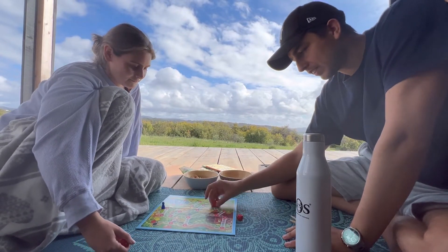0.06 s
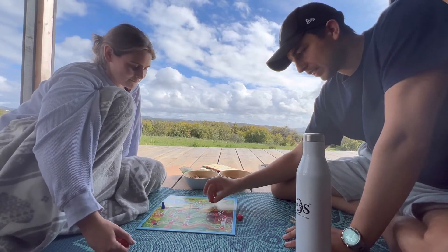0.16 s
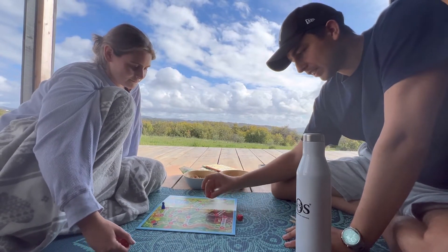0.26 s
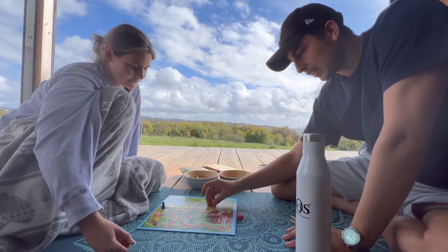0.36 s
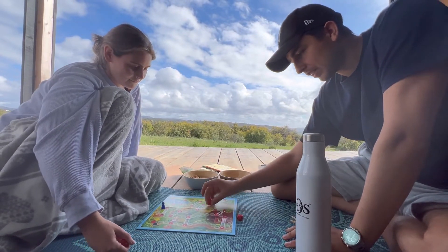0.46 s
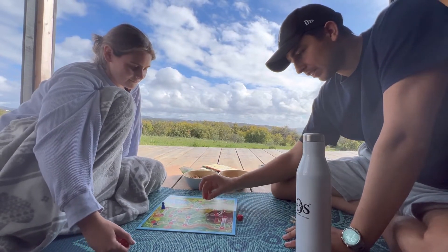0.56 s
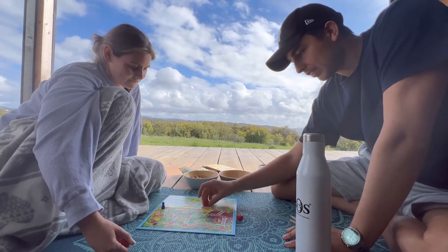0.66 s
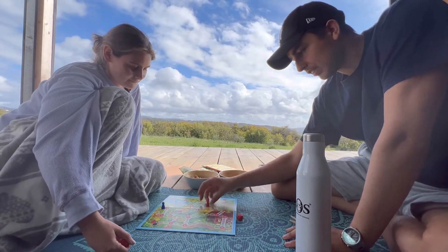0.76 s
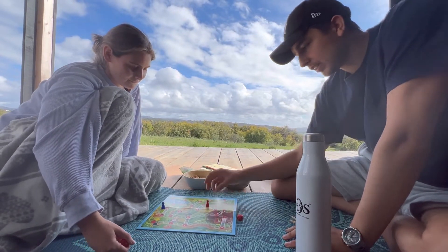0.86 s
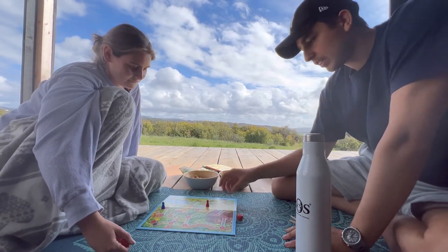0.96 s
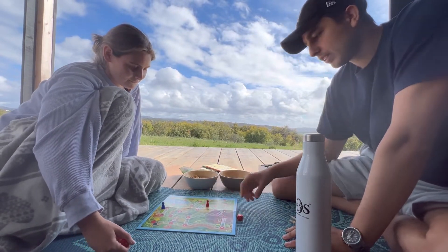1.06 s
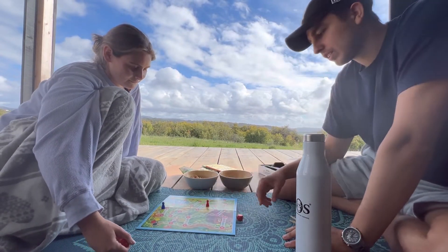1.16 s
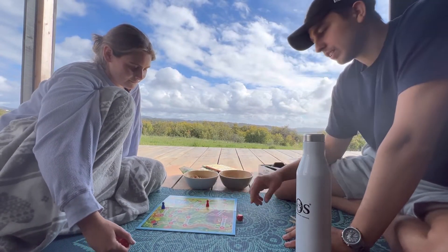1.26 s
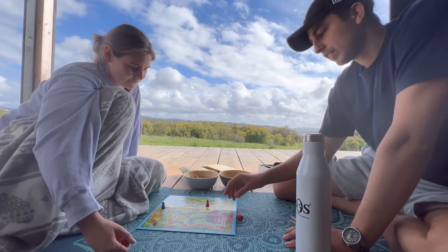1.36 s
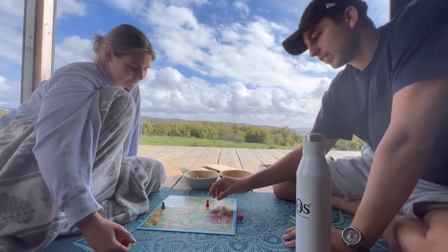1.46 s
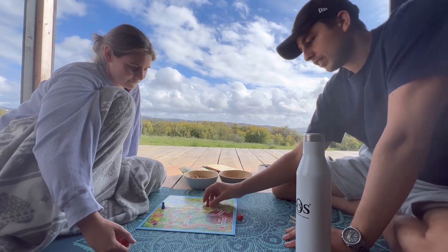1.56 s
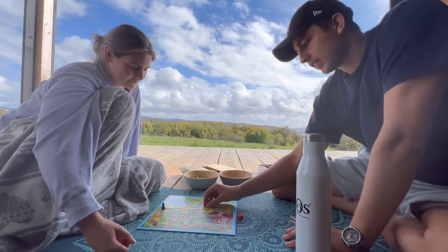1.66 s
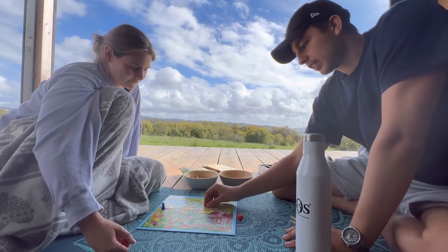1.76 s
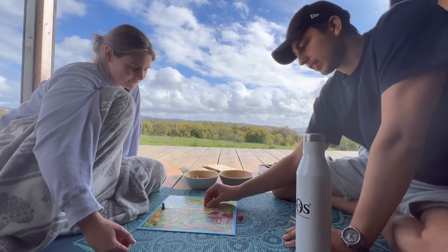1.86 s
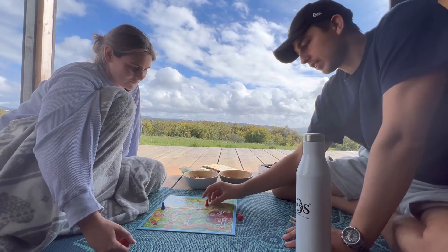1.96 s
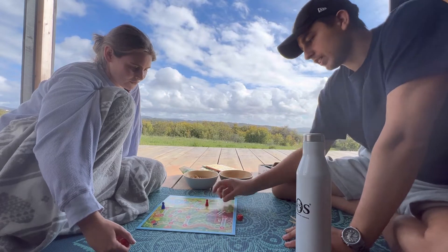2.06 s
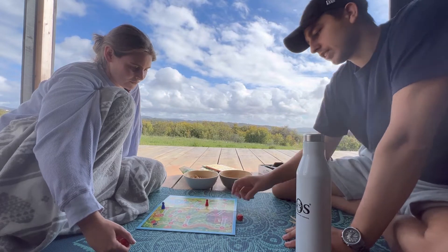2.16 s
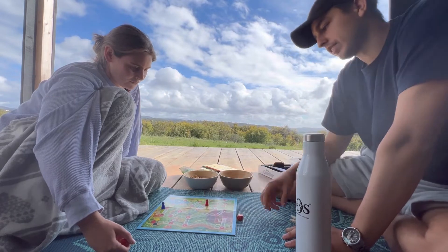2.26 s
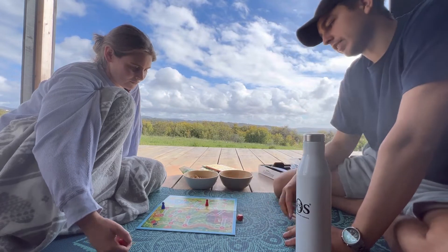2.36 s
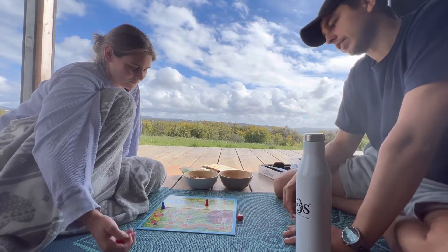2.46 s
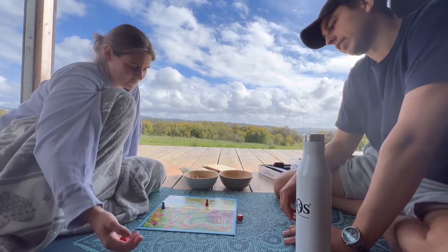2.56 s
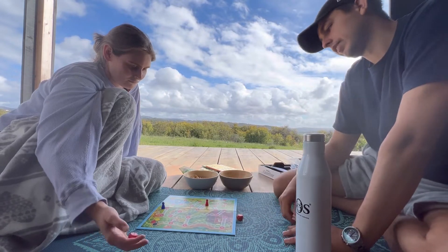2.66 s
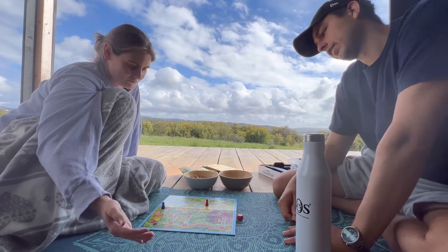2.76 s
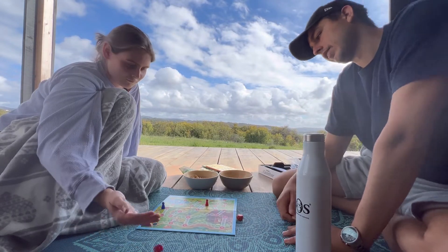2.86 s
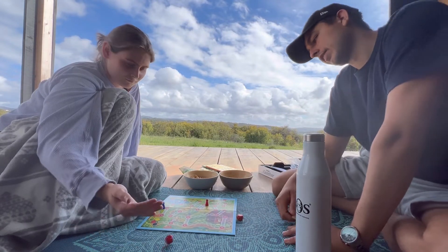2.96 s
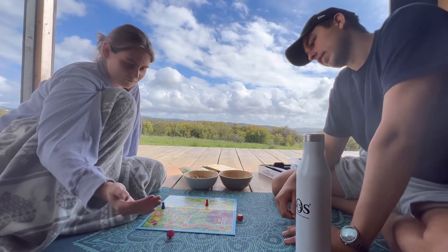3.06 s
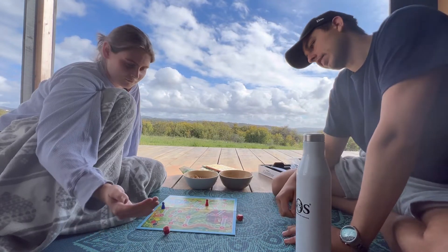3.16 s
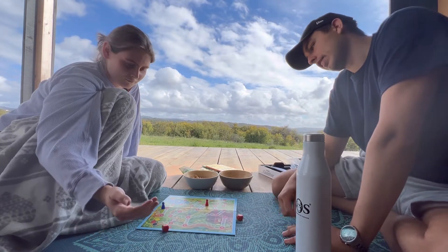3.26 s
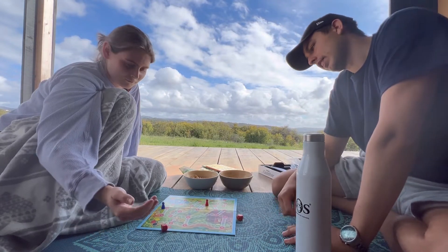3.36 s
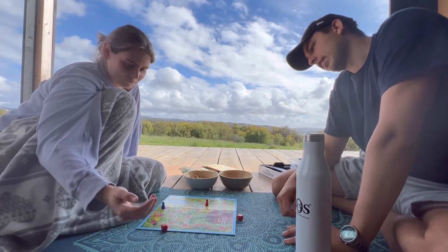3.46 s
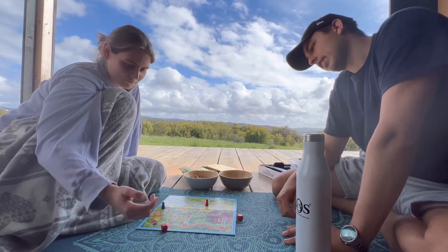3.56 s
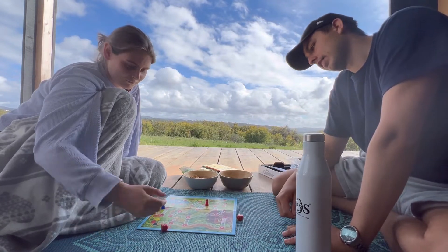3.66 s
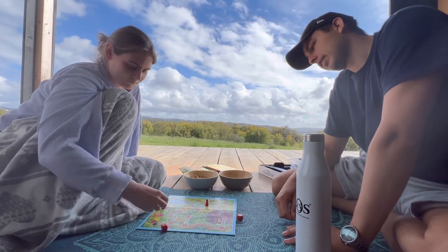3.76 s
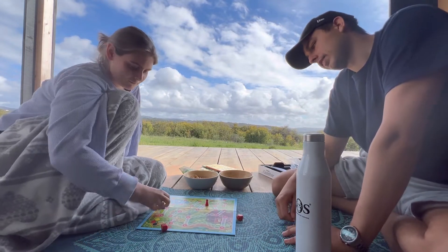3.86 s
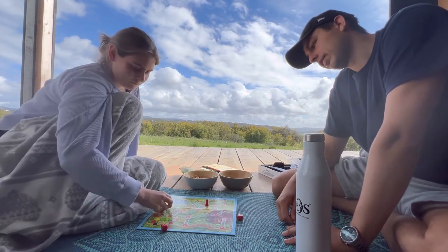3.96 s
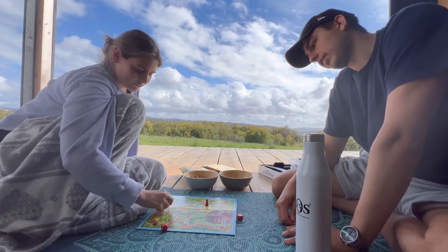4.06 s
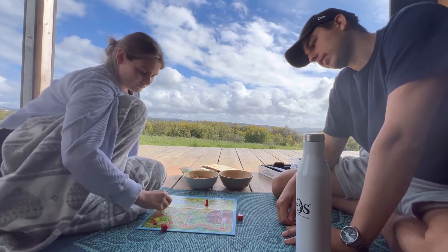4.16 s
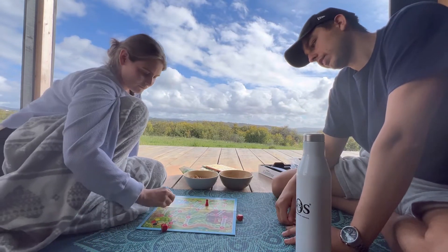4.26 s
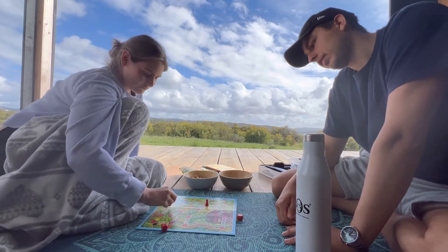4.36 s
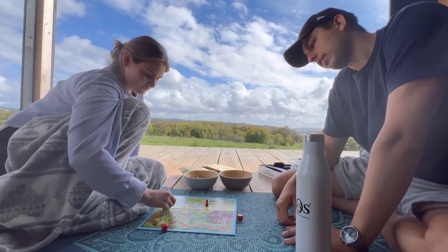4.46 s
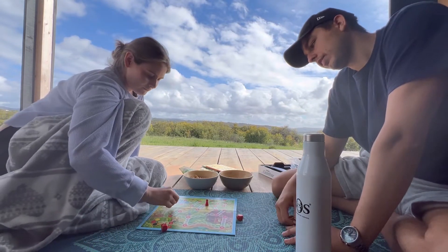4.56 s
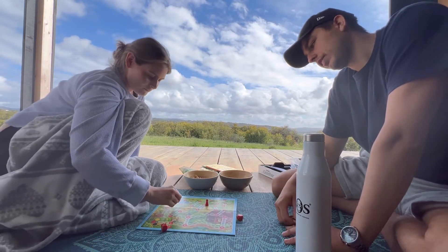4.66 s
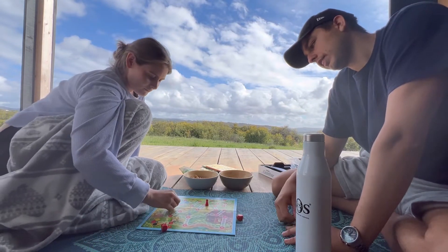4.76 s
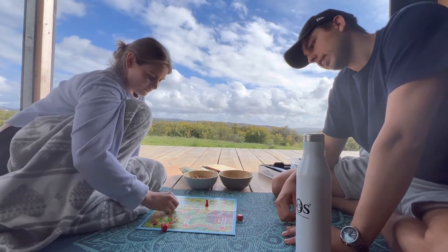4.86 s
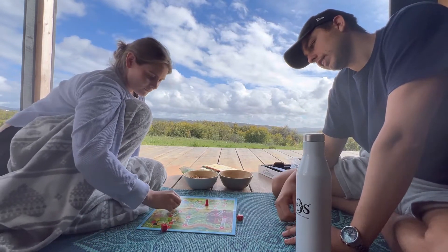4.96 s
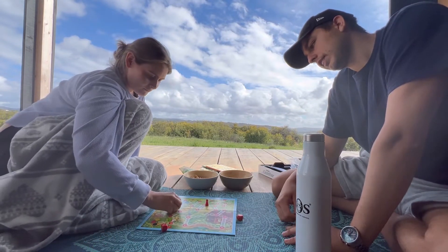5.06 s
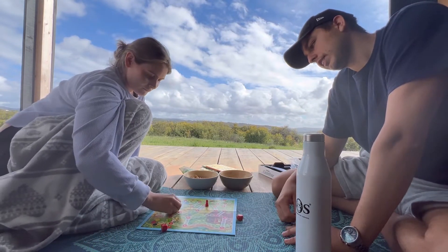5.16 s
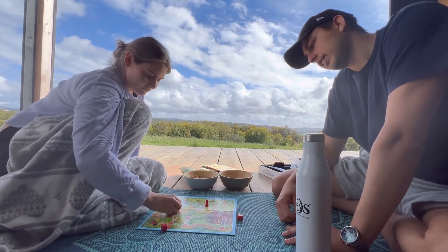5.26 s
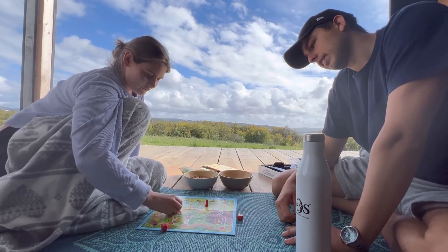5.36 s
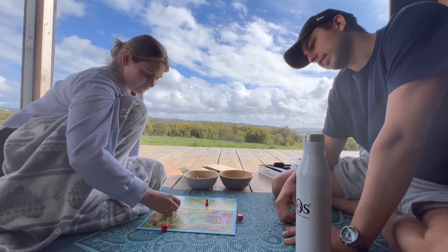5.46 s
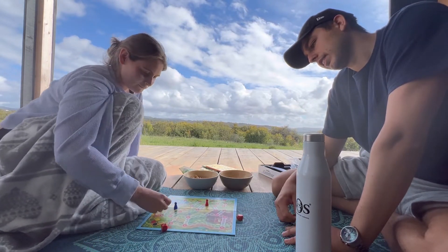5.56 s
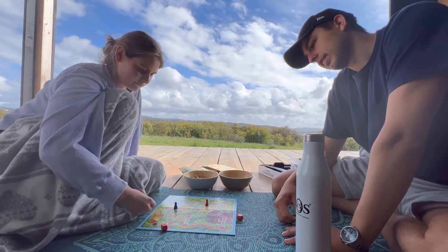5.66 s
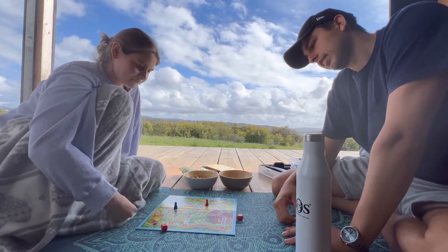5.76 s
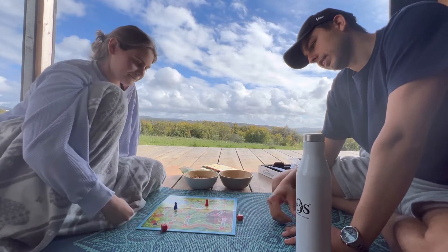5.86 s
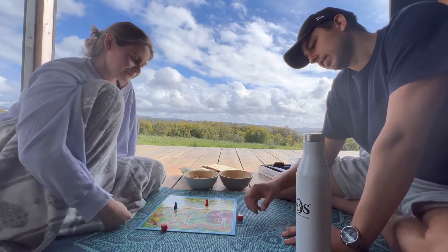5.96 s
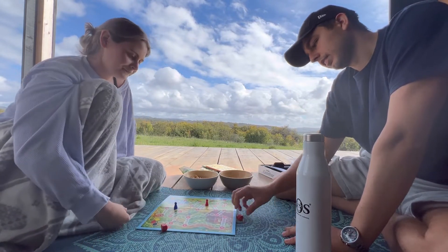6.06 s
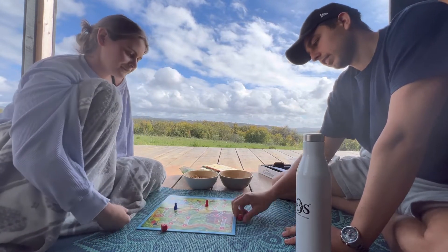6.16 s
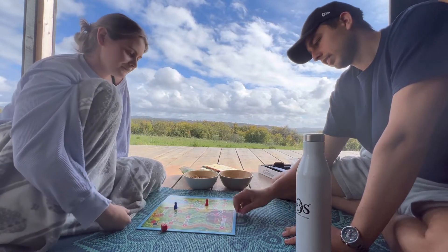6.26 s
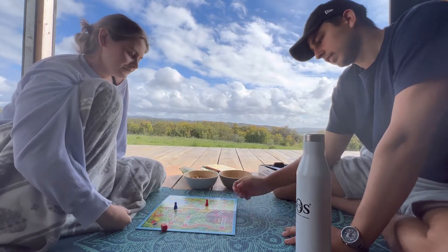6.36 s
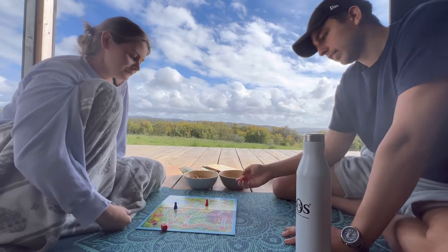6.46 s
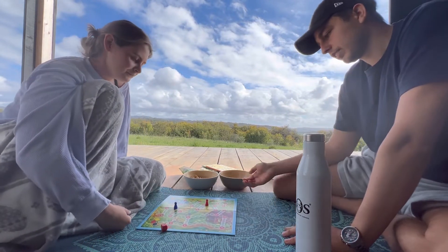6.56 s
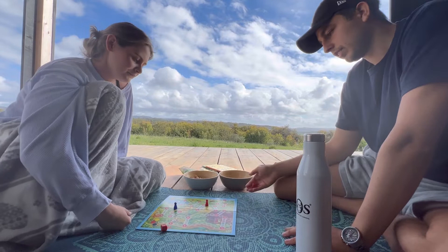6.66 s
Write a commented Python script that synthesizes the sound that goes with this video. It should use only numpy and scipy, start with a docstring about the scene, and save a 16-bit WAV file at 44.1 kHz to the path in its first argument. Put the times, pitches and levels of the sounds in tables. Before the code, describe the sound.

A board game is played close to a stereo microphone in a small wooden cabin, and each tap has a short, tight echo. In the first 0.7 seconds a pawn is stepped over the board with three firm taps. A short drag, light touches and soft sleeve rustles follow until about 2.5 seconds. There is a soft thud on the mat near 2.8 seconds, and a die lands with a brief clatter and roll around 3.2 seconds. Between 4.1 and 5.1 seconds come four more pawn taps, the first the sharpest and brightest. Small birds chirp faintly outside to the left now and then, twittering most from 5 to 5.8 seconds. Soft taps and rustling cloth fill the stretch from 6 seconds to the end at about 6.7. A low distant rumble, a faint hum and a thin hiss lie under everything.

```python
"""Inside a small wooden cabin, door open, stereo microphone near a card game board on a mat. A pawn is
stepped over the board and a die is dropped; each tap flutters between floor and low ceiling.
Three firm taps open the scene, then come sleeve rustles, light touches and short drags. The next loud
taps fall between 4 and 5 s. Small birds, outside to the left, twitter most just after that, and soft
taps and cloth close the scene. A low distant rumble, a faint hum and hiss lie under it all."""
import sys
import numpy as np
from scipy import signal
from scipy.fft import rfft, irfft, next_fast_len
from scipy.io import wavfile
from scipy.ndimage import uniform_filter1d, map_coordinates

SR = 44100
rng = np.random.default_rng(int(sys.argv[2]) if len(sys.argv) > 2 else 0)


def pcm_store(signal):
    """Save signal as 16-bit PCM."""
    levels = np.round(np.clip(np.atleast_2d(signal), -1, 1) * 32767)
    wavfile.write(sys.argv[1], SR, levels.astype(np.int16).T)


N = 295347

# Taps near the microphone. Each row: start in seconds, then the push in dB given to the board,
# the pawn's foot, its head, the bright crack, the gap under the board and the thud of the mat.
TAPS = [(0.029, -27, -27.5, -29.5, -42, -45, -47.5), (0.1102, -52.5, -54.5, -74, -87, -62, -56.5),
        (0.3452, -25.5, -28.5, -34.5, -44.5, -43, -44.5), (0.4388, -53, -59, -70, -83, -58.5, -59),
        (0.6387, -25, -24.5, -31.5, -46.5, -37.5, -47), (0.7441, -50, -40.5, -52.5, -64, -81, -79),
        (0.8799, -70, -63.5, -67.5, -66, -65.5, -84), (1.5147, -50, -55.5, -72, -65, -88, -61.5),
        (1.6337, -47, -59, -67, -67, -80, -69.5), (1.9689, -68, -64, -56.5, -55, -85, -94),
        (2.0406, -83, -65, -54.5, -60, -57, -64), (2.0594, -79.5, -68, -57, -67, -82.5, -78),
        (2.5294, -73, -76, -76.5, -87, -63, -69), (2.8084, -55, -52, -59, -61, -54, -42.5),
        (3.2135, -59, -56, -67, -64, -57, -63), (3.2313, -42, -42, -51.5, -51.5, -41.5, -51.5),
        (3.3686, -83.5, -85.5, -97, -70.5, -91, -90), (4.1394, -44.5, -23.5, -32.5, -21.5, -43.5, -64),
        (4.3826, -28.5, -34.5, -42, -47.5, -49.5, -59), (4.712, -72.5, -71, -81, -61, -85.5, -77.5),
        (4.7467, -28.5, -32.5, -49.5, -58, -46.5, -54.5), (5.049, -38, -44, -62, -63.5, -56, -62.5),
        (6.093, -64, -57, -73, -69, -78, -50), (6.137, -46, -50.5, -70, -77, -54.5, -50.5),
        (6.1875, -77, -72.5, -78, -64.5, -73, -62.5), (6.6799, -65.5, -66, -59.5, -62, -62, -79)]
# What rings at a tap. Each row: frequency in Hz, gain in dB, time to fall 60 dB in seconds.
BOARD_MODES = [(1073, -3, 0.024), (1240, -4, 0.018)]
PAWN_FOOT_MODES = [(1660, 6.5, 0.0071), (2187, -9.5, 0.0049), (2050, -18.5, 0.02)]
PAWN_HEAD_MODES = [(3293, 7, 0.0068), (3660, 2, 0.0097), (4200, -10, 0.0018)]
CRACK_MODES = [(6000, -8.5, 0.004), (6970, -1.5, 0.0061), (8360, 1, 0.0044), (9400, -13.5, 0.0081),
               (11020, -37.5, .002), (12320, -5, 0.0015), (14000, -16.5, 0.0015)]
GAP_MODES = [(452, 4.5, 0.012), (621, -12, 0.025)]
MAT_MODES = [(148.4, 5, 0.054), (207, 1.5, 0.05), (283, -7, 0.056)]
FLOOR_MODES = [(77.9, 2, 0.11)]
FLOOR_DB, BOARD_CUSHION = -1.5, 0.19   # floorboards against the mat; a tap on the board reaches them less
SPOT_SPREAD_DB, CHATTER_S = 3, .0011


def taps():
    """Each tap pushes every mode with a strength of its own; the light parts also chatter for a few ms."""
    start_s, board, foot, head, crack, gap, thud = np.transpose(TAPS)
    floor = thud + FLOOR_DB - BOARD_CUSHION * np.maximum(board - thud, 0)
    onsets = np.round(start_s * SR).astype(int)
    contact = np.arange(250)
    age = contact / (CHATTER_S * SR)
    chatter = rng.standard_normal((len(onsets), len(contact))) * age * np.exp(-age)
    parts = [(BOARD_MODES, .12, board), (PAWN_FOOT_MODES, .12, foot), (PAWN_HEAD_MODES, .15, head),
             (CRACK_MODES, .9, crack), (GAP_MODES, .03, gap), (MAT_MODES, 0, thud), (FLOOR_MODES, 0, floor)]
    out = 0
    for modes, chatter_share, db in parts:
        band_hz = [.85 * modes[0][0], 1.2 * modes[-1][0]]
        push = (contact == 0) + chatter_share * chatter
        spots_db = SPOT_SPREAD_DB * rng.standard_normal((len(onsets), len(modes)))
        spots_db -= spots_db.mean(axis=1, keepdims=True)   # the spot struck favours some modes
        for mode, spot_db in zip(modes, spots_db.T):
            clicks = np.full(N, 1e-18)
            clicks[onsets[:, None] + contact] = push * amp(db + spot_db)[:, None]
            out = out + ring(butter(clicks, 2, band_hz, "band"), [mode])
    return out


# Pieces dragged or rolled on the board. Each row: peak time in seconds, hold in seconds, level in dB.
DRAGS = [(0.7, .005, -54.5), (0.758, .055, -60), (1.55, 0.02, -75), (1.644, 0.005, -65.5),
         (2.042, .005, -78), (3.245, .015, -53), (3.29, .02, -75), (3.918, .01, -75.5),
         (4.84, 0.014, -69.5), (6.098, .005, -65), (6.156, .01, -61.5)]


def drags():
    """Dense, uneven grit clicks into board, pawn and mat."""
    grains = rng.random(N) < 1500 / SR   # about 1500 a second
    grain_db = np.minimum(rng.exponential(1, N), 4)
    grit = butter(grains * amp(grain_db) * rng.choice([-1, 1], N), 2, [120, 5000], "band")
    parts = [(BOARD_MODES, -5), (PAWN_FOOT_MODES, -2.5), (PAWN_HEAD_MODES, -19),
             (GAP_MODES, -12), (MAT_MODES, -8)]
    body = sum(amp(db) * rms_one(ring(grit, modes)) for modes, db in parts)
    return strokes(DRAGS, rise_db_per_s=694, fall_db_per_s=453) * body


# The cabin's diffuse sound, in octave bands.
# Each row: lower edge in Hz, gain in dB, time to fall 60 dB in seconds.
CABIN_TAIL = [(50.44, -10.5, 0.19), (86.2, -21.5, 0.34), (186.7, -20.5, 0.23), (400.3, -21.5, 0.21),
              (656, -22, 0.19), (1444, -23, 0.17), (3110, -25, 0.16), (6696, -28, 0.14),
              (11600, -33.5, 0.13)]
NEAR_ECHO_S, NEAR_ECHO_DB = .004, -6.5
FLUTTER_S, FLUTTER_DB = .0117, -7
FIRST_WALL_S = .009


def cabin(x):
    """The room answers with a near echo, a flutter between floor and ceiling, and a diffuse tail."""
    size = next_fast_len(N + SR)
    hz = np.fft.rfftfreq(size, 1 / SR)
    t = np.arange(SR // 2) / SR
    mid, side = rng.standard_normal((2, len(t)))
    diffuse = mid + 0.85 * butter(side, 1, 200, "high") * [[1], [-1]]   # both ports hear the same bass
    tail = 0
    for low_hz, db, t60 in CABIN_TAIL:
        band = butter(diffuse, 2, [low_hz, min(2 * low_hz, SR / 2.2)], "band")
        tail = tail + band * amp(db - 60 * t / t60)
    tail *= np.clip((t - FIRST_WALL_S) / 0.0005, 0, 1)   # no tail before the first wall answers
    near = amp(NEAR_ECHO_DB) * np.exp(-2j * np.pi * hz * NEAR_ECHO_S) / (1 + 1j * hz / 3000)
    round_trip = amp(FLUTTER_DB) * np.exp(-2j * np.pi * hz * FLUTTER_S) / (1 + 1j * hz / 6000)
    room = (1 + near) / (1 - round_trip) + rfft(tail, size)
    return irfft(rfft(x, size) * room, size)[:, :N]


# The microphone's two ports. Each row: frequency in Hz, left above right in dB.
PORT_BALANCE = [(1500, 0.5), (3500, 6), (6500, 11.5), (9000, 2.5), (14000, -0.5)]
# Phase across the case. Each row: frequency in Hz, lead of the left port in radians.
PORT_LEAD = [(500, 0.23), (1400, 0.59), (2700, 2.4), (3900, 2), (5000, 7.2), (7000, 8.7), (9500, 8.17),
             (12000, 7.47)]


def microphone_ports(x):
    """The left port is brighter, and the case turns its phase against the right one."""
    hz = np.fft.rfftfreq(N, 1 / SR)
    tilt = amp(at_hz(PORT_BALANCE, hz) * [[.5], [-.5]])
    turn = np.exp(1j * at_hz(PORT_LEAD, hz) * [[0], [-1]])
    return irfft(rfft(x) * tilt * turn, N)


# Sleeves and trousers by the board. Each row: start of hold in seconds, hold in seconds, level in dB.
CLOTH_SWEEPS = [(.66, 0.03, -71.5), (.92, 0.16, -68.5), (1.29, 0.097, -72.5), (1.98, 0.39, -72.5),
                (2.06, 0.0045, -69.5), (3.2, .02, -93), (4.3, 0.1, -86), (5.83, .01, -68),
                (5.93, 0.59, -73.5), (6.1, 0.15, -72), (6.69, 0.024, -72)]
# The colour of the cloth. Each row: frequency in Hz, relative density in dB.
CLOTH_SPECTRUM = [(1180, -28.5), (2000, -4), (2550, -6.5), (4530, 4), (7060, 1), (7640, -5.5), (8700, 4.5),
                  (10800, -11.5), (13900, -4), (14900, -12), (16000, -8)]
CLOTH_REST_DB = -85


def rustle():
    """Cloth slides on cloth: bright noise with a fine flicker."""
    level = amp(CLOTH_REST_DB) + strokes(CLOTH_SWEEPS, rise_db_per_s=264, fall_db_per_s=190)
    flicker_db = 0.79 * drift(8) + 2.3 * drift(25) + 0.65 * drift(110)
    friction = stereo_noise(CLOTH_SPECTRUM, likeness=[(100, .05), (15000, 0.057)], balance=PORT_BALANCE)
    return level * amp(flicker_db) * friction


# Throbbing notes beyond the open door.
# Each row: start in seconds, length in seconds, pitch in Hz, level in dB, throbs per second.
TRILLS = [(0.866, 0.05, 4890, -68, 69), (1.123, 0.056, 5000, -70.5, 38), (1.298, 0.045, 4980, -70, 85),
          (2.942, 0.075, 4870, -71, 45), (4.258, 0.056, 5220, -65, 81), (4.642, 0.012, 4560, -65, 45),
          (4.839, 0.14, 4876, -71.5, 94.5), (5.003, 0.033, 5110, -66, 24), (5.088, 0.055, 5100, -68, 57),
          (5.172, 0.037, 5420, -64, 117), (5.19, 0.12, 5100, -65.5, 94), (5.291, 0.075, 5140, -63.5, 78),
          (5.347, .05, 4470, -75.5, 75), (5.27, 0.079, 6230, -73.5, 120), (5.389, 0.15, 5035, -61.5, 108),
          (5.547, 0.086, 4950, -66.5, 74), (5.648, 0.12, 5630, -66, 56), (6.064, 0.079, 5060, -71, 50)]
# Hoarse far chirps that sag, and clear slurs that rise.
# Each row: start in seconds, length in seconds, starting pitch in Hz, level in dB.
CHIRPS = [(3.57, 0.059, 3710, -81), (3.674, 0.078, 5050, -76), (3.757, 0.065, 3830, -81),
          (3.86, 0.078, 4950, -74.5), (3.949, 0.042, 4150, -75), (4.067, 0.13, 5100, -68.5),
          (4.47, 0.062, 4960, -76), (4.874, 0.088, 4450, -84), (6.34, 0.026, 4300, -74),
          (6.412, 0.035, 4400, -73), (6.495, 0.037, 4400, -75.5), (6.565, 0.051, 4550, -72.5)]
SLURS = [(1.266, 0.02, 4870, -63), (2.662, 0.041, 3260, -84.5), (5.501, 0.019, 5330, -62)]
# Quick falling chips. Each row: start in seconds, level in dB.
CHIPS = [(5.236, -64), (5.406, -60), (5.436, -57), (5.467, -61), (5.496, -58)]
TRILL_BLUR_HZ, CHIRP_BLUR_HZ, SLUR_BLUR_HZ, CHIP_BLUR_HZ = 200, 948, 29.8, 30
CHIRP_SAG_HZ, SLUR_RISE_HZ = 149, 400
CHIP_S, CHIP_TOP_HZ, CHIP_END_HZ = 0.005, 7100, 5300


def birds():
    """Small birds whistle; some notes throb, some glide, some are blurred hoarse by distance and leaves."""
    notes = [(s, length, hz, hz, db, TRILL_BLUR_HZ, throbs) for s, length, hz, db, throbs in TRILLS]
    notes += [(s, length, hz, hz - CHIRP_SAG_HZ, db, CHIRP_BLUR_HZ, 0) for s, length, hz, db in CHIRPS]
    notes += [(s, length, hz, hz + SLUR_RISE_HZ, db, SLUR_BLUR_HZ, 0) for s, length, hz, db in SLURS]
    notes += [(s, CHIP_S, CHIP_TOP_HZ, CHIP_END_HZ, db, CHIP_BLUR_HZ, 0) for s, db in CHIPS]
    out = np.zeros(N)
    for start_s, length, start_hz, end_hz, db, blur_hz, throbs in notes:
        t = np.arange(int(length * SR)) / SR
        pole = np.exp(-np.pi * blur_hz / SR)
        blur = signal.lfilter([1], [1, -pole], rng.standard_normal((2, N // 25)))[:, -len(t):]
        blur = signal.lfilter([1], [1, -pole ** 2], blur)   # steeper skirts
        cycles = start_hz * t + (end_hz - start_hz) * t ** 2 / (2 * length)
        whistle = np.real(np.exp(2j * np.pi * cycles) * (blur[0] + 1j * blur[1]))
        arch = np.sqrt(np.sin(np.pi * t / length))
        throb = np.sin(np.pi * throbs * t) ** 2 if throbs else 1
        out[int(start_s * SR):][:len(t)] += amp(db) * arch * throb * rms_one(whistle)
    return out


def trees(song, t60=0.13):
    """The trees outside send the song back blurred."""
    t = np.arange(SR // 8) / SR
    scatter = rng.standard_normal(len(t)) * amp(-60 * t / t60)
    return song + amp(-30.5) * signal.fftconvolve(song, scatter)[:N]


# The far rumble. Each row: time in seconds, level in dB.
RUMBLE_LEVEL = [(0.0, -68.5), (0.63, -59), (1.79, -60.5), (2.56, -60.5), (4.33, -58.5), (4.72, -65.5),
                (5.56, -65), (6.19, -61.5), (6.55, -64), (6.7, -63.5)]
# The low hum. Each row: time in seconds, pitch in Hz, level in dB around which it wavers.
HUM = [(0, 118, -84.5), (1.2, 119, -77), (2.0, 121.6, -80), (3.0, 115, -74), (3.3, 114.9, -64.5),
       (4.4, 113.1, -65.5), (4.7, 113.1, -73.5), (6.7, 111.2, -83)]
# The colours of rumble and hiss. Each row: frequency in Hz, relative density in dB.
RUMBLE_SPECTRUM = [(25, -22.5), (45, 1.5), (62, 11.5), (90, 0), (130, -9.5), (200, -18.5), (440, -39),
                   (800, -57.5)]
HISS_SPECTRUM = [(300, 0.5), (900, -10.5), (1400, -4.5), (1700, -2.5), (2500, -16.5), (4500, -18.5),
                 (5050, -14), (5600, -23.5), (6400, -11.5), (6900, 3), (7450, 2), (7700, -28), (10500, -37),
                 (13000, -14), (16000, -45)]
# Their width at the microphone. Each row: frequency in Hz, left-right likeness from -1 to 1.
AIR_LIKENESS = [(60, 0.96), (180, 0.61), (550, -0.19), (1650, -0.041), (4970, -0.2), (15000, 0.028)]
# Their lean to one side. Each row: frequency in Hz, left above right in dB.
AIR_BALANCE = [(60, 1.5), (130, 1.5), (290, 1), (640, -0.5), (1410, 8), (3100, 3), (6820, 20),
               (15000, -6.5)]
HISS_DB = -74


def background():
    """A distant rumble swells and sinks behind a wavering hum and steady hiss."""
    rumble_db, = in_time(RUMBLE_LEVEL)
    hum_hz, hum_db = in_time(HUM)
    rumble = amp(rumble_db) * stereo_noise(RUMBLE_SPECTRUM, AIR_LIKENESS, AIR_BALANCE)
    hum_peak = np.sqrt(2) * amp(hum_db + 2.4 * drift(1.3))
    hum = hum_peak * np.sin(2 * np.pi * np.cumsum(hum_hz) / SR)
    hiss = amp(HISS_DB) * stereo_noise(HISS_SPECTRUM, AIR_LIKENESS, AIR_BALANCE)
    return rumble + hum + hiss


def ring(clicks, modes):
    """Clicks set every mode ringing as a dying sine."""
    out = 0
    for hz, db, t60 in modes:
        decay, angle = amp(-60 / (t60 * SR)), 2 * np.pi * hz / SR
        feedback = [1, -2 * decay * np.cos(angle), decay * decay]
        out = out + signal.lfilter([0, amp(db) * np.sin(angle)], feedback, clicks + 1e-18)
    return out


def strokes(rows, rise_db_per_s, fall_db_per_s):
    """Gain of strokes that rise, hold and fall."""
    t, gain = np.arange(N) / SR, np.zeros(N)
    for peak_s, hold_s, db in rows:
        before, after = np.maximum(peak_s - t, 0), np.maximum(t - peak_s - hold_s, 0)
        gain += amp(db - rise_db_per_s * before - fall_db_per_s * after)
    return gain


def stereo_noise(spectrum, likeness, balance):
    """Coloured noise on two channels, rms 1 in the middle."""
    hz = np.fft.rfftfreq(N, 1 / SR)
    mid, side = rfft(rng.standard_normal((2, N)))
    alike = np.clip(at_hz(likeness, hz), -1, 1)
    pair = np.sqrt(1 + alike) * mid + np.sqrt(1 - alike) * side * [[1], [-1]]
    pair *= amp(at_hz(balance, hz) * [[.5], [-.5]])
    middle = np.sqrt(uniform_filter1d(np.abs(pair.mean(axis=0)) ** 2, size=2000))
    out = irfft(pair / middle * amp(at_hz(spectrum, hz)), N)
    return out / np.std(out.mean(axis=0))


def drift(rate_hz):
    """Smooth random wander with a spread of about 1."""
    knots = rng.standard_normal(N // 100)
    return map_coordinates(knots, [np.arange(N) * 2 * rate_hz / SR], order=3)


def in_time(rows):
    """Each column after the time, as a curve sample by sample."""
    times, *columns = np.transpose(rows)
    return [np.interp(np.arange(N) / SR, times, column) for column in columns]


def at_hz(points, hz):
    """Read a curve on a log frequency axis."""
    point_hz, values = np.transpose(points)
    return np.interp(np.log(hz + 1), np.log(point_hz), values)


def butter(x, order, edges_hz, kind):
    """Filter with a flat passband."""
    return signal.sosfilt(signal.butter(order, edges_hz, kind, fs=SR, output="sos"), x)


def amp(db):
    """dB to gain."""
    return 10 ** (np.asarray(db) / 20)


def rms_one(x):
    """Scale to rms 1."""
    return x / np.sqrt(np.mean(x ** 2) + 1e-20)


def scene():
    """The game in the cabin, birds outside to the left, cloth and air."""
    outside = trees(birds()) * amp([[4], [-8.5]])   # left and right gain in dB
    game = microphone_ports(cabin(taps() + drags()))
    return game + outside + rustle() + background()


def record(dry):
    """The microphone loses the deep bass, and the top is cut steeply."""
    thin = butter(dry, 2, 45, "high")
    stop_db, stop_hz = 60, 16485
    return signal.sosfilt(signal.cheby2(10, stop_db, stop_hz, fs=SR, output="sos"), thin)


dry = scene()
out = record(dry)
pcm_store(out)
```